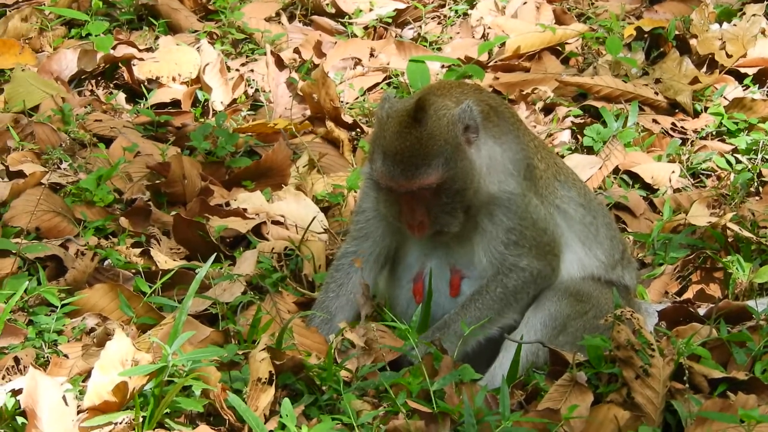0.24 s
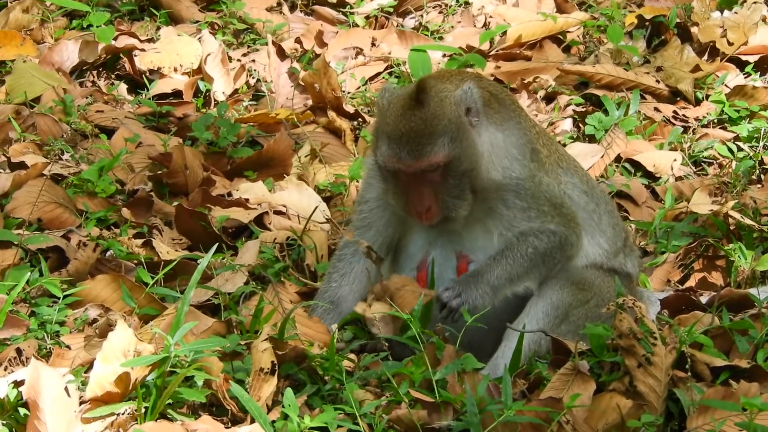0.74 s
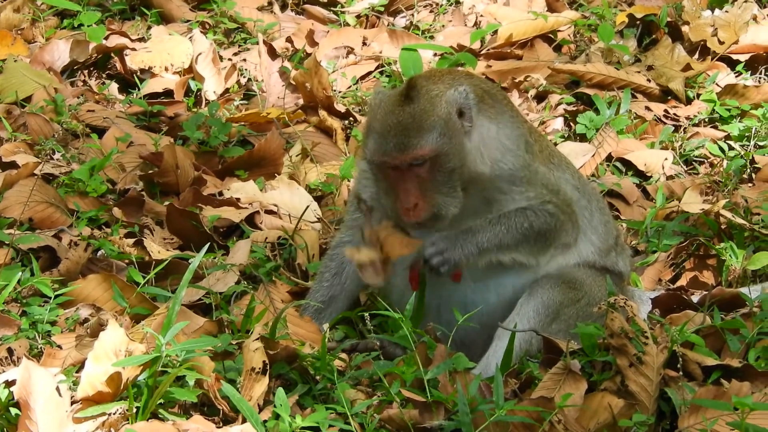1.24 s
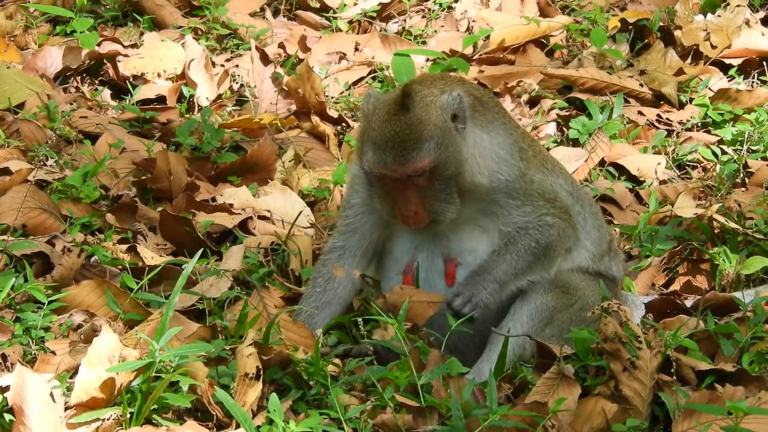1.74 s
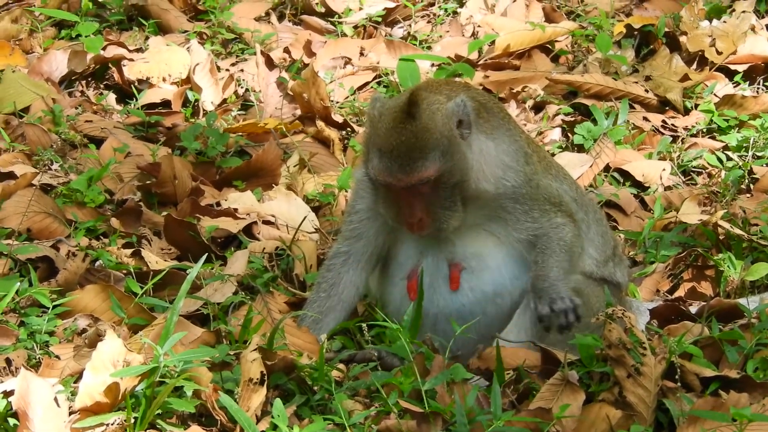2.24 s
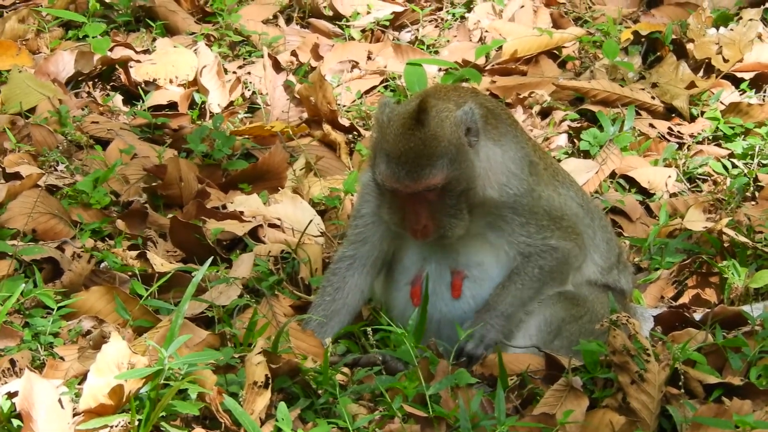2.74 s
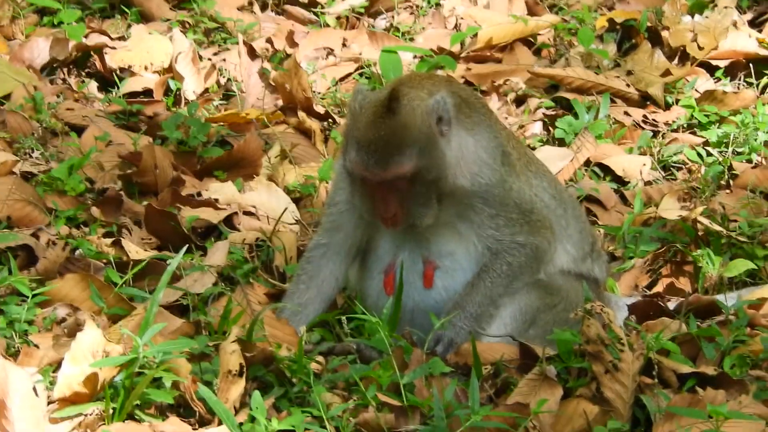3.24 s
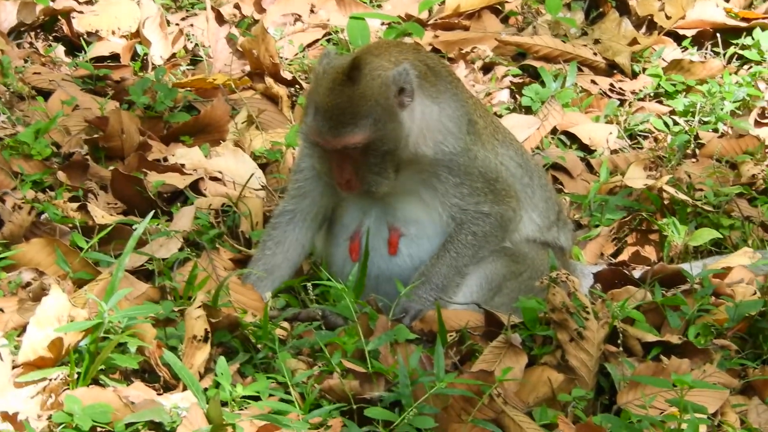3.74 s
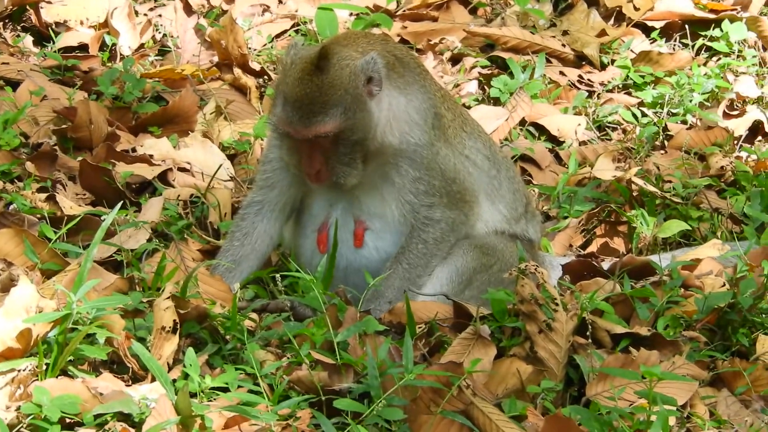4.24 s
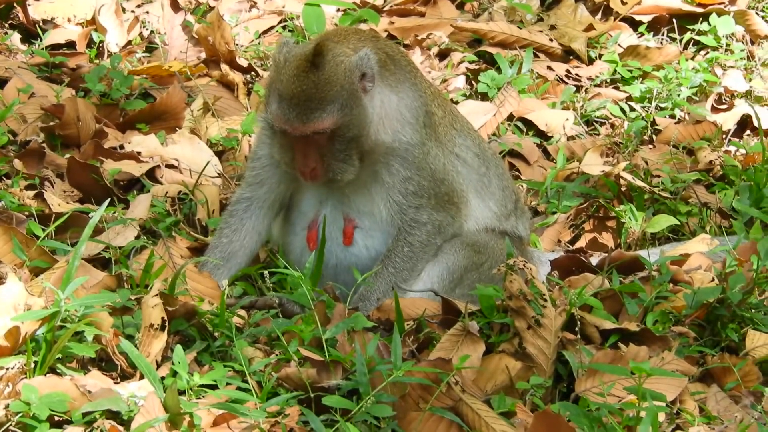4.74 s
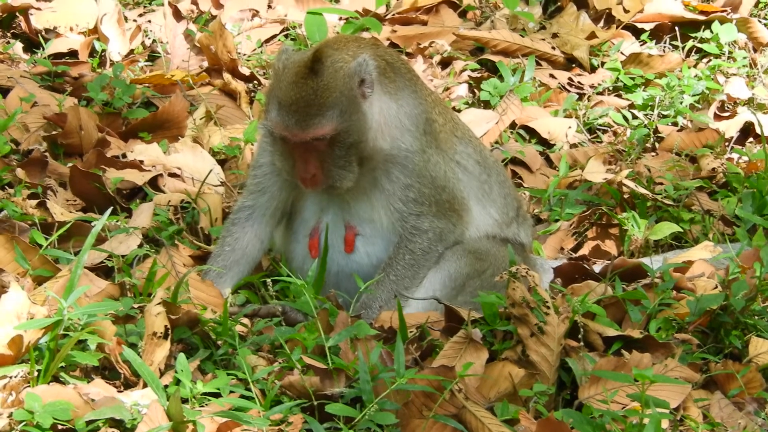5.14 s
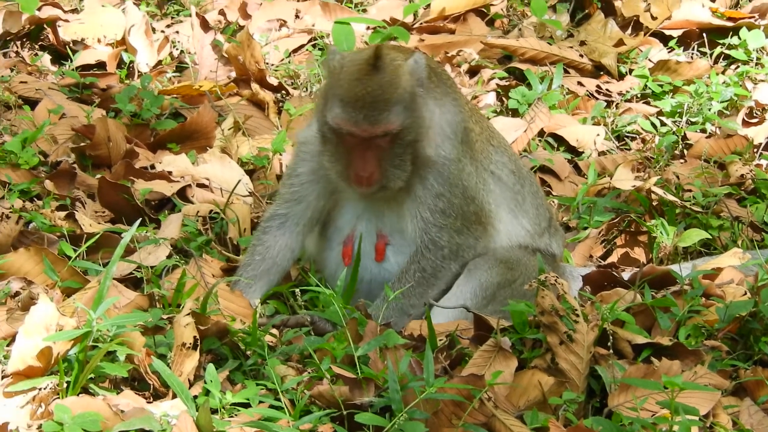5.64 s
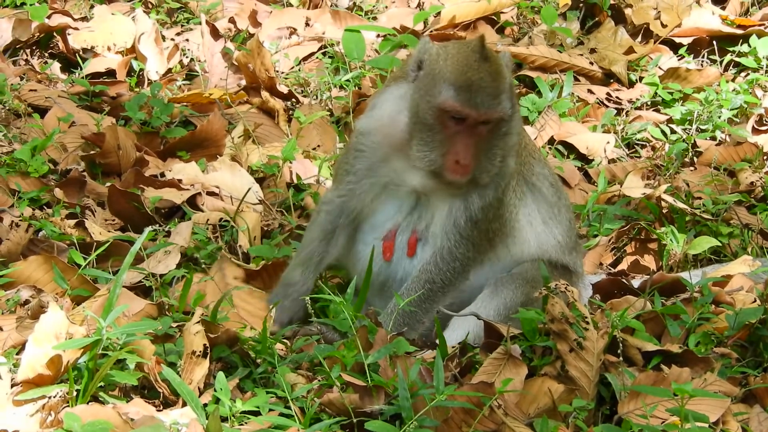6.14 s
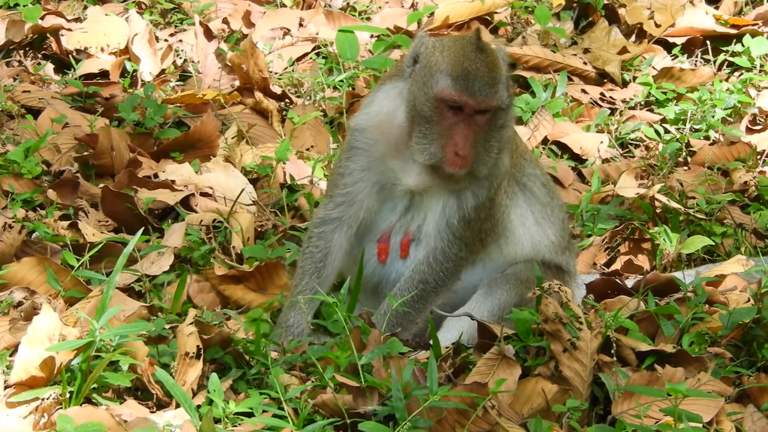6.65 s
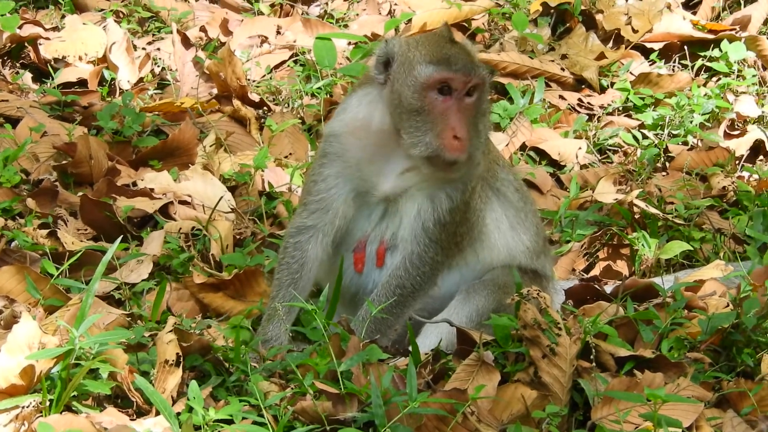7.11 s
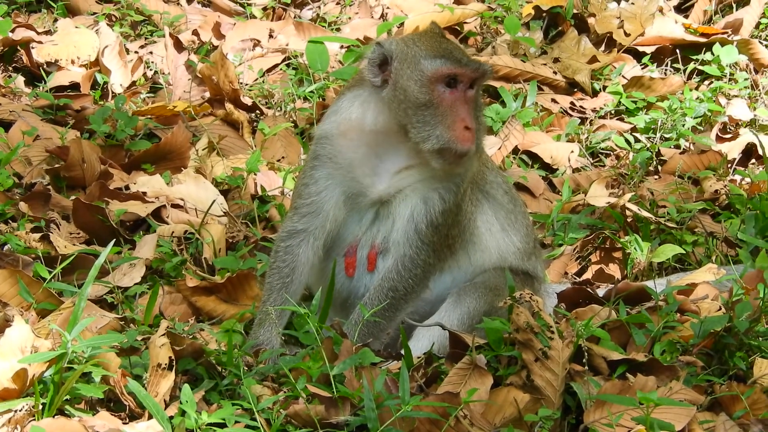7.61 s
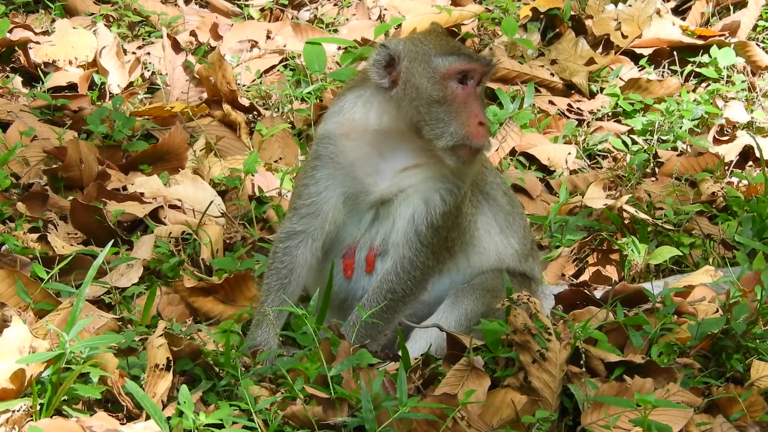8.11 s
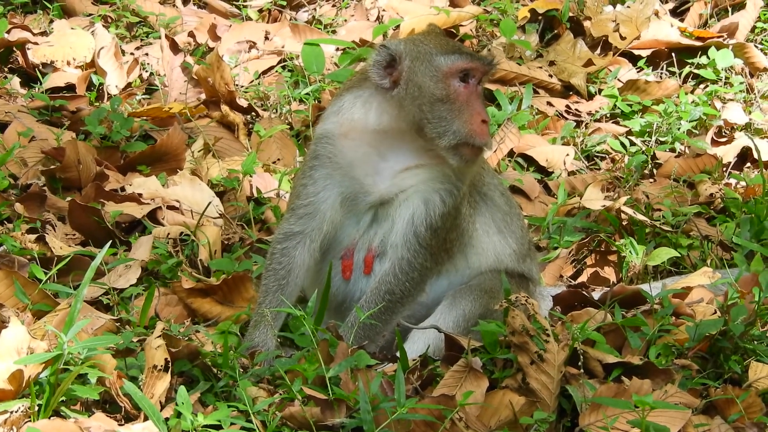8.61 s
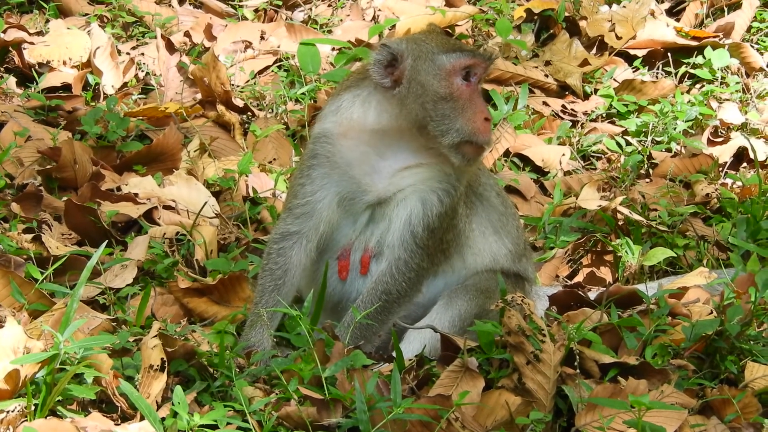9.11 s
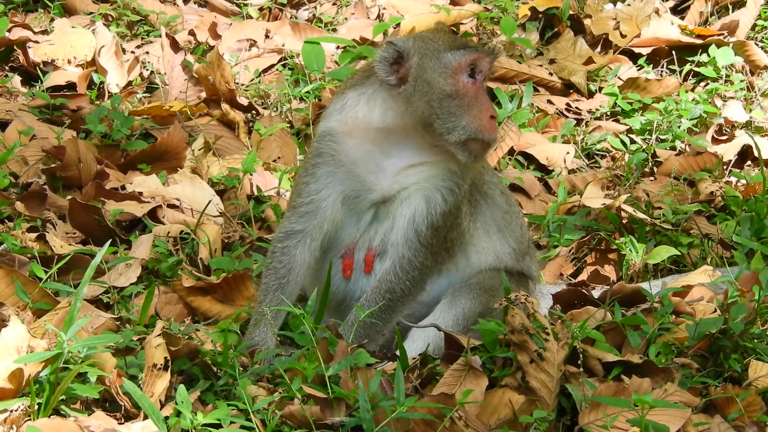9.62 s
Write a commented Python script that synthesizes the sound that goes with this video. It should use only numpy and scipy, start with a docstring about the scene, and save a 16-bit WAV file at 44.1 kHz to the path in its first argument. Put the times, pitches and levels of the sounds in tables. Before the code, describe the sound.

Outdoors in a forest, a wide, piercing cicada chorus runs throughout, with nearer insects pulsing rapidly and growing stronger over a fine hiss. Beneath it lie distant traffic rumble and a low steady hum. A faraway engine slowly rises in pitch and nears. Faint gliding bird whistles come before the middle, sparse leaf ticks later, and a soft trill near the end. The stereo microphone hears a broad, open ambience.

```python
"""Cicadas drone in a forest: a wide chorus and a few nearer, throbbing ones a little higher in pitch,
each a ringing tone pumped by clicks, over the hiss of the farthest insects.
Far off a motor vehicle slowly speeds up and comes nearer: engine orders through exhaust resonances,
with coloured noise for tyres and distant traffic, and a steady low hum. Birds give a few faint gliding
whistles and a trill, and dry leaves tick, as decaying noise bursts, where a monkey forages."""
import sys
import numpy as np
from scipy import signal
from scipy.fft import rfft, irfft, next_fast_len
from scipy.io import wavfile

SR = 44100
rng = np.random.default_rng(int(sys.argv[2]) if len(sys.argv) > 2 else 0)


def dump_mix(stems):
    """Bounce the given channels to the path in sys.argv[1] as a 16-bit WAV at rate SR."""
    frames = np.atleast_2d(stems).T  # one column per channel
    limited = np.clip(frames, -1, 1)  # hard clip at full scale
    pcm = np.round(limited * 32767).astype(np.int16)
    wavfile.write(sys.argv[1], SR, pcm)


N = 435266
TIME = np.arange(N) / SR
# nearness of the vehicle, which raises its growl and tyre noise: (t/s, level/dB)
VEHICLE_APPROACH = [(0, -46), (1.5, -44.5), (3.2, -42), (5.0, -38), (5.6, -39.5), (6.3, -36), (7.2, -37.5),
                    (7.7, -35), (8.8, -31), (9.25, -26.5), (9.55, -29.5), (9.87, -33.5)]


def amp(db):
    """Amplitude ratio: 20 dB for each factor of ten."""
    return 10 ** (np.asarray(db) / 20)


def unit(x):
    """Normalisation to a root-mean-square amplitude of 1."""
    return x / np.sqrt(np.mean(x ** 2) + 1e-20)


def curve(rows):
    """Linear interpolation of a time table at every sample."""
    return np.interp(TIME, *np.transpose(rows))


def shape(points, hz):
    """Linear interpolation of a spectrum on a log-frequency axis."""
    f, value = np.transpose(points)
    return np.interp(np.log(hz + 1), np.log(f), value)


def add(mix, s, sound):
    """Superposition: a sound adds to the mix from time s."""
    part = mix[round(s * SR):][:len(sound)]
    part += sound[:len(part)]


def wander(rate):
    """Slow random modulation of rms 1: straight lines between about rate new values a second."""
    knots = rng.standard_normal(N // 8)
    return unit(np.interp(TIME * rate + rng.random(), np.arange(len(knots)), knots))


def ports(pair, spectrum=None):
    """Spatial coherence: two unrelated signals, mixed as sum and difference, correlate by frequency."""
    # correlation of the two microphones: (f/Hz, left-right likeness)
    likeness = [(30, 1), (220, 0.95), (350, 0.23), (520, 0.58), (950, 0.68), (2200, 0.52), (2650, 0.8),
                (4200, 0.27), (5350, 0.7), (6500, 0), (8000, 0.043), (11000, 0)]
    size = next_fast_len(N, True)
    hz = np.fft.rfftfreq(size, 1 / SR)
    colour = 1 if spectrum is None else amp(shape(spectrum, hz))
    a, b = rfft(pair, size) * colour
    same = np.clip(shape(likeness, hz), -1, 1)
    mid = a * np.sqrt((1 + same) / 2)
    side = b * np.sqrt((1 - same) / 2)
    return irfft(np.array([mid + side, mid - side]), size)[:, :N]


def noise(spectrum, patchy_db):
    """Filtered random noise of rms 1 whose time-frequency patches come and go."""
    z = signal.stft(rng.standard_normal((2, N)), nperseg=1024, noverlap=768)[2]
    blur = np.outer(np.hanning(7), np.hanning(24))  # frequency bins by frames
    patches = unit(signal.fftconvolve(rng.standard_normal(z.shape[1:]), blur, "same"))
    patchy = signal.istft(z * amp(patchy_db * patches), nperseg=1024, noverlap=768)[1][:, :N]
    return unit(ports(patchy, spectrum))


def forest(x, t60):
    """Reverberation: trunks and leaves scatter sound into echoes that fall 60 dB in t60 seconds."""
    t = np.arange(SR) / SR
    tail = rng.standard_normal((2, SR)) * np.exp(-np.log(1000) * t / t60)
    tail /= np.linalg.norm(tail, axis=1, keepdims=True)
    return ports(signal.oaconvolve(x[None], tail, axes=1)[:, :N])


def cicadas(level_db, partials, pitch_hz, spread, jitter, jitter_rate, click_rate, buzz,
            drone_db, drone_pan_db, count):
    """Driven resonance: each abdomen rings at its own unsteady pitch, pumped by its tymbal clicks."""
    flutter_low_db, flutter_high_db, flutter_per_s = 2.34, 0.8, 36  # from moving air
    low, high = np.zeros((2, N)), np.zeros((2, N))
    for side in range(2):
        for place in np.linspace(-1, 1, count):
            hz = pitch_hz * (1 + spread * place + jitter * wander(jitter_rate))
            ring = np.exp(2j * np.pi * (np.cumsum(hz) / SR + rng.random()))
            click_hz = click_rate * (1 + .02 * place + .07 * wander(25))
            clicks = np.cumsum(click_hz) / SR + rng.random()
            pump = unit(1 + buzz * np.cos(2 * np.pi * clicks)) * np.sqrt(2 / count)
            low[side] += pump * ring.real
            # powers of the rotating phasor give the upper partials
            high[side] += pump * sum(amp(db) * (ring ** round(k)).real for k, db in partials)
    # the lowest partial flutters most and leans to one side
    lean_db = drone_pan_db * np.array([[.5], [-.5]])
    drone = ports(low) * amp(drone_db + flutter_low_db * wander(flutter_per_s) + lean_db)
    return drone + ports(high) * amp(level_db + flutter_high_db * wander(flutter_per_s))


def throb():
    """Amplitude modulation, in dB: nearly regular swells, uneven in strength, that slowly grow louder."""
    first_s, period_s, slip_s = 0.09, 0.17, 0.013  # slip: rms timing error of a swell
    base_db, rise_db_per_s, depth_db, uneven_db = -42, 0.95, 3.5, 2
    beats = (TIME - first_s + slip_s * wander(3)) / period_s
    swell = np.cos(np.pi * beats) ** 4
    return base_db + rise_db_per_s * TIME + depth_db * swell + uneven_db * wander(26)


def insects():
    """Superposed sources: the wide chorus, a few throbbing insects nearby and the blurred far hiss."""
    # upper partials: (multiple of the pitch, level/dB)
    chorus_partials = [(2, 2), (3, 4), (4, -11.5)]
    throb_partials = [(2, 0.5), (3, -2.5), (4, -46)]
    # colour of the farthest insects: (f/Hz, level per Hz/dB)
    hiss = [(1500, -20.5), (2300, -6.5), (3000, -6.5), (3400, -10), (3950, -23), (4600, -4.5), (5900, 3),
            (6150, 0), (7000, -2.5), (8500, 7.5), (8850, 2), (9700, -2.5), (10850, -8.5), (11100, -11)]
    # the chorus slowly eases off while its lowest partial keeps its mean level
    wide = cicadas(-33 - 0.22 * TIME, chorus_partials, pitch_hz=2630, spread=.010,
                   jitter=.021, jitter_rate=420, click_rate=120, buzz=0.92,
                   drone_db=-38, drone_pan_db=-3.0, count=6)
    near = cicadas(throb(), throb_partials, pitch_hz=2694, spread=.006,
                   jitter=.006, jitter_rate=300, click_rate=75, buzz=0.26,
                   drone_db=-41 + 0.45 * (TIME - TIME.mean()), drone_pan_db=1.0, count=2)
    far = noise(hiss, patchy_db=2.0) * amp(-34.5)
    return wide * amp([[-.2], [.2]]) + near + far


def engine():
    """Harmonic orders of the firing rate, glided through exhaust resonances; moving air wavers them."""
    # speed of the engine: (t/s, firing rate f/Hz)
    firing = [(0.0, 29.92), (1.3, 31.01), (2.0, 32.25), (3.0, 33.45), (5.0, 36.71), (6.0, 37.45),
              (6.3, 38.13), (7.3, 38.57), (7.85, 39.51), (8.8, 38.69), (9.87, 38.36)]
    # exhaust resonances: (f/Hz, level/dB)
    exhaust = [(39, -22), (75, -12), (96, 7.5), (116, -9), (135, 0.5), (158, -7), (178, 1.5), (193, 0.5),
               (208, -11), (232, -14.5), (270, -27), (312, -21.5), (345, -24), (400, -35), (550, -42)]
    # the exhaust's boom, the second order: (t/s, level/dB)
    boom_level = [(0, -55), (1.2, -48), (1.8, -39.5), (4.1, -41.5), (4.8, -37.7), (6.7, -35.5),
                  (7.4, -41.5), (7.85, -29.2), (8.5, -33.5), (9.87, -36)]
    rate = curve(firing)
    phase = 2 * np.pi * np.cumsum(rate) / SR
    boom = amp(curve(boom_level) + 1.0 * wander(5)) * np.sin(2 * phase + 0.46 * wander(4))
    growl = np.zeros(N)
    for k in [1, *range(3, 13)]:  # only low orders carry this far; the higher waver most
        waver = 2 * np.pi * rng.random() + .016 * k ** 2 * wander(11)
        growl += amp(shape(exhaust, k * rate) + 0.41 * k * wander(7)) * np.sin(k * phase + waver)
    growl_db = curve(VEHICLE_APPROACH) - 1.5 + 1.3 * wander(6)
    return np.sqrt(2) * (boom + amp(growl_db) * growl)


def road():
    """Tonal and broadband sources together: engine orders, traffic rumble and tyre noise."""
    # noise colours: (f/Hz, level per Hz/dB)
    rumble_colour = [(15, -23), (35, -19), (50, -10), (64, -6.5), (82, -7), (102, 0.5), (122, 1),
                     (133, -0.5), (160, -1), (200, -6), (230, -17.5), (260, -32), (400, -25.5), (700, -44)]
    tyre_colour = [(100, -4), (240, 8), (330, 5.5), (520, -0.5), (700, 0), (1000, 0.5), (1450, -2.5),
                   (2200, -4), (3200, -5.5), (4200, -10), (8000, -26)]
    # rumble of distant traffic: (t/s, level/dB)
    traffic = [(0, -38), (1.0, -37), (2.0, -35), (3.0, -36), (4.2, -37), (5.6, -34.5), (6.3, -36.5),
               (7.2, -35), (8.0, -32), (9.0, -35.5), (9.87, -30)]
    rumble = noise(rumble_colour, patchy_db=0.76) * amp(curve(traffic))
    # the tyres rise by a share of the approach
    tyres = noise(tyre_colour, patchy_db=2.5) * amp(-24 + 0.56 * curve(VEHICLE_APPROACH))
    return (engine() + rumble) * amp([[-.65], [.65]]) + tyres


def bird():
    """Frequency glides: short slurred whistles, smeared by reverberation among the trees."""
    # (t/s, length/s, start f/Hz, middle f/Hz, end f/Hz, level/dB, initial share an octave below)
    whistles = [(2.48, .13, 3450, 3450, 3000, -46, 0.35), (3.661, .145, 3490, 3440, 3070, -44.5, .4),
                (4.50, 0.11, 4200, 4310, 4447, -49, 0), (4.755, 0.095, 3450, 3750, 4080, -51, 0),
                (4.91, 0.13, 4100, 3950, 3900, -52, 0), (5.085, 0.14, 4000, 4290, 4600, -49, 0)]
    song = np.zeros(N)
    for s, length, start, middle, end, db, octave in whistles:
        u = np.linspace(0, 1, round(length * SR))
        hz = np.polyval(np.polyfit([0, .5, 1], [start, middle, end], 2), u)
        unsteady_hz = hz * (1 + .014 * wander(350)[:len(u)])
        phase = 2 * np.pi * np.cumsum(unsteady_hz) / SR
        note = np.sin(phase) + octave * (1 - u) * np.sin(phase / 2)
        add(song, s, np.sqrt(2) * amp(db) * note * signal.windows.tukey(len(u), .3))
    return song + .8 * forest(song, t60=.9)


def trill(start, end, centre_hz, note_rate, db):
    """Periodic amplitude modulation: a far bird's quick notes, heard only through their echoes."""
    swell = np.sin(np.pi * np.clip((TIME - start) / (end - start), 0, 1))
    notes = np.sin(np.pi * note_rate * (TIME - start)) ** 2
    hz = centre_hz * (1 + 0.032 * wander(400))
    song = amp(db) * swell * notes * np.sin(2 * np.pi * np.cumsum(hz) / SR)
    return forest(song, t60=0.28)


def litter():
    """Impulsive excitation: leaves and twigs snap as band-shaped noise with exponential decay."""
    # (t/s, level before decay/dB, centre f/Hz, spread/octaves, decay time constant/s)
    ticks = [(5.980, -29, 2520, 0.37, 0.0042), (7.203, -22, 7600, 0.7, 0.003),
             (7.238, -35, 7060, .8, 0.0026), (9.037, -35, 7030, 1.06, 0.0038), (9.548, -35, 6970, .8, .003)]
    snaps, t = np.zeros(N), np.arange(4096) / SR
    hz = np.fft.rfftfreq(len(t), 1 / SR)
    for s, db, centre_hz, octaves, decay in ticks:
        colour = np.exp(-.5 * (np.log2((hz + 1) / centre_hz) / octaves) ** 2)
        burst = unit(irfft(rfft(rng.standard_normal(len(t))) * colour))
        add(snaps, s, amp(db) * burst * np.exp(-t / decay))
    return snaps + 0.7 * forest(snaps, t60=.25)


def hum():
    """Nearly periodic oscillation: a steady low machine tone with slight drift in pitch and level."""
    turns = np.cumsum(51.6 * (1 + 0.0029 * wander(2.67))) / SR  # 51.6 Hz
    tone = np.sqrt(2) * amp(-39 + 0.36 * wander(4)) * np.sin(2 * np.pi * turns)
    return tone * amp([[-.6], [.6]])


def scene():
    """Linear superposition of all sources at the two microphones."""
    birds = bird() + trill(start=8.13, end=9.1, centre_hz=4150, note_rate=9.0, db=-42)
    return insects() + road() + birds + litter() + hum()


def record(dry):
    """Low-pass filtering: the recorder's band limit at 11050 Hz."""
    low_pass = signal.firwin(601, 11050, window=("kaiser", 9), fs=SR)
    return signal.oaconvolve(dry, low_pass[None], "same", axes=1)


dry = scene()
out = record(dry)
dump_mix(out)
```